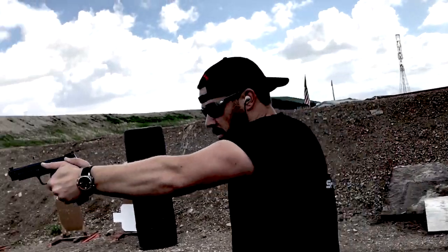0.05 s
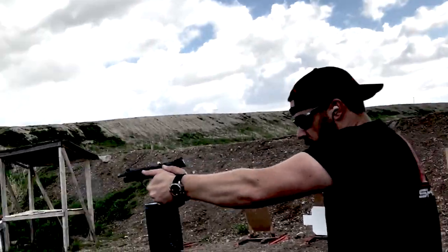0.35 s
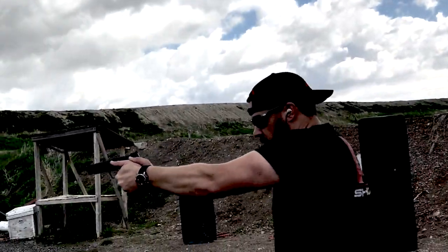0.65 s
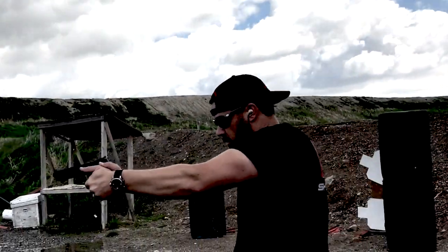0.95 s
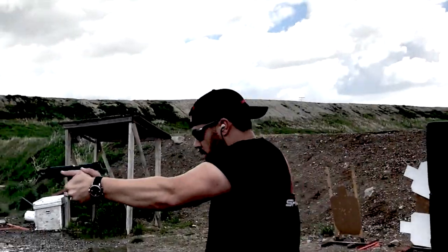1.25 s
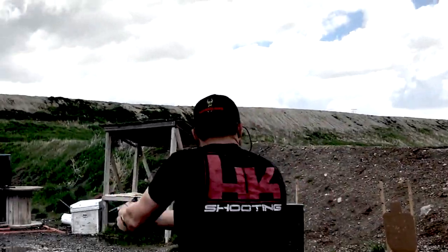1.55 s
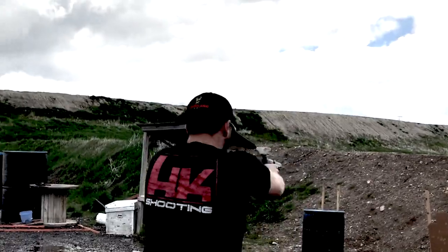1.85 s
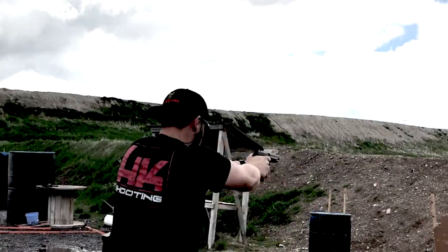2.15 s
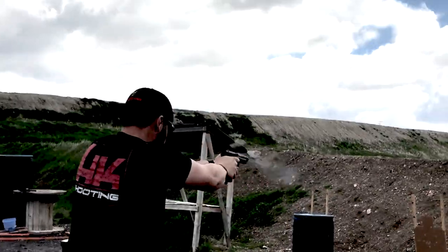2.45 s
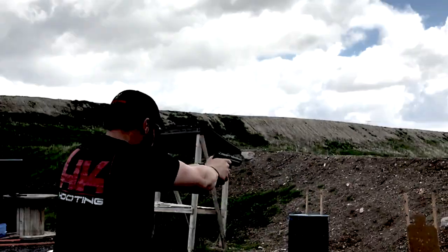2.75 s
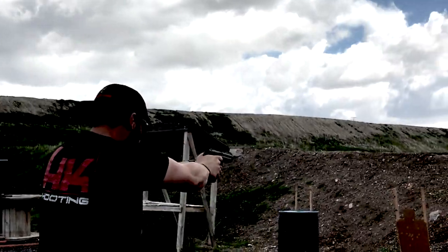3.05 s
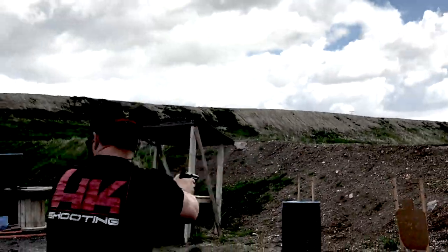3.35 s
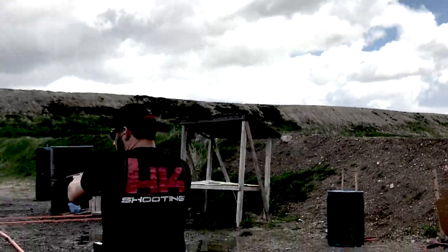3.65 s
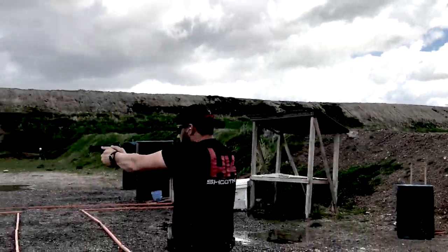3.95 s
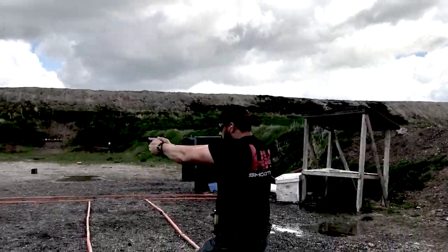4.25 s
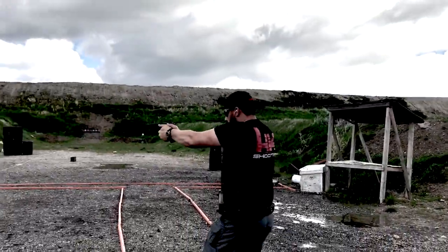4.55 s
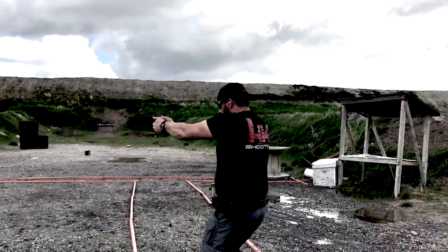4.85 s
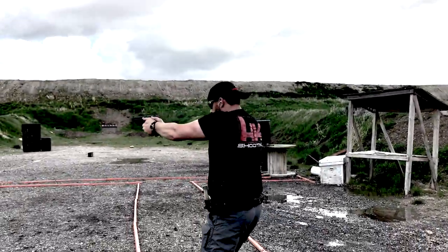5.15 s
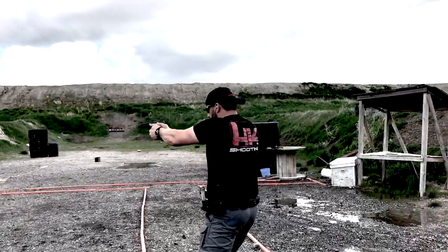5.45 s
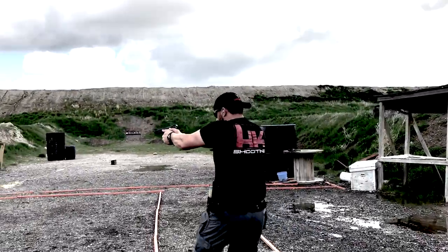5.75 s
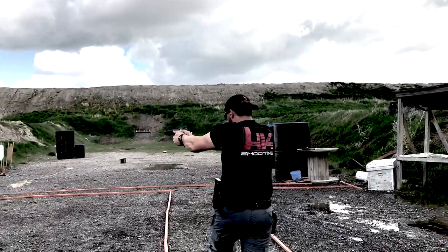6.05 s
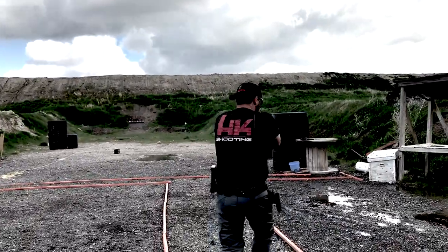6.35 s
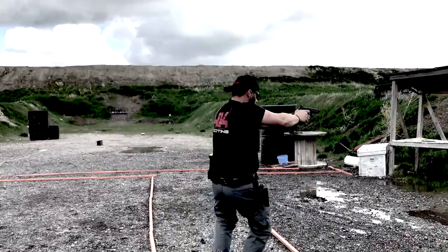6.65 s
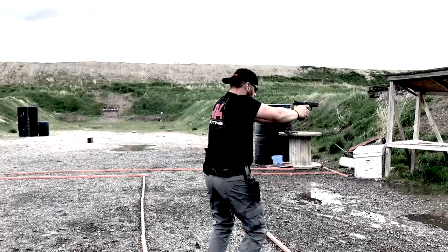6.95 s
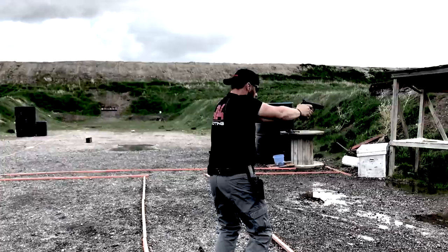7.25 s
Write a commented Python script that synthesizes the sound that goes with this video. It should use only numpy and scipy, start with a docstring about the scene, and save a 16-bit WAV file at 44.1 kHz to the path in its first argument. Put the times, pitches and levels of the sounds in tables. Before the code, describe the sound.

A pistol fires eleven sharp shots on an outdoor range, a few steps from the microphone. Four come in two quick pairs, then two spaced shots, a run of four and a final one. Each blast slightly overloads the microphone and slaps back from nearby objects and earth banks. In the pauses, boots crunch on gravel, spent brass cases tinkle faintly and light wind buffets the moving microphone.

```python
"""Pistol on a gravel range

Eleven shots outdoors, a few steps from a microphone that follows the shooter. Each blast overloads it,
scatters off the ground and slaps back from a shelter, barrels and earth banks, sooner as the shooter
advances; half a second later distant terrain answers with a faint falling sigh. Between the strings
boots crunch over gravel, spent brass cases tinkle and air buffets the moving microphone."""
import sys
import numpy as np
from scipy import signal
from scipy.fft import rfft, irfft
from scipy.io import wavfile

SR = 44100
rng = np.random.default_rng(int(sys.argv[2]) if len(sys.argv) > 2 else 0)


def to_wav(sig):
    """Store sig (one row per channel, or 1-D mono) as 16-bit WAV at the path in sys.argv[1].

    Samples outside -1..1 are clipped; the rate is SR.
    """
    pcm = np.clip(np.atleast_2d(sig), -1, 1) * 32767
    pcm = np.round(pcm).astype(np.int16)
    wavfile.write(sys.argv[1], SR, pcm.T)  # frames by channels


N = 330557

# shots: t/s, advance/m, crack/dB, roar/dB, roar hold/s, boom/dB, echoes/dB, rush/dB
SHOTS = [(.432, 0, -20, -15.5, 0.042, -33, 0.5, -16), (0.6895, 0.2, -16.5, -18, 0.025, -27, 0, -39),
         (1.0802, .89, -15.5, -18.5, 0.036, -25, -2, -34.5),
         (1.3438, 1.5, -13.5, -18.5, 0.035, -21.5, -0.5, -30.5),
         (2.5752, 3, -19.5, -17.5, 0.053, -16, -8.5, -19), (3.1975, 2.5, -14.5, -20, 0.037, -42, -5, -29.5),
         (4.7898, 5.5, -16.5, -21, .064, -21.5, -2.5, -19.5),
         (5.3014, 5, -16.5, -23, 0.037, -42, -1, -22.5), (5.7868, 5.5, -16.5, -21, 0.041, -36, 1, -38),
         (6.086, 5.5, -17, -20, 0.038, -34, 1.5, -36.5), (7.059, 7, -17, -18, 0.055, -21, -5.5, -18.5)]
# muzzle blast spectrum: f/Hz, level/dB
BLAST = [(18, -38.5), (30, -12.5), (945, 0), (1050, -1), (1260, -0.5), (1720, -6.5), (2550, -7), (4090, -9),
         (5040, -14), (6050, -12), (7260, -17.5), (8500, -15), (10500, -20.5), (11900, -16), (15500, -21)]


def amp(db):
    """Decibels to gain."""
    return 10 ** (np.asarray(db) / 20)


def unit(x):
    """Scale to unit rms."""
    return x / np.sqrt(np.mean(x ** 2) + 1e-20)


def read(points, hz):
    """Interpolate a table over log frequency."""
    f, value = np.transpose(points)
    return np.interp(np.log(hz + 1), np.log(f + 1), value)


def add(mix, s, sound):
    """Mix a sound in at time s."""
    part = mix[max(round(s * SR), 0):][:len(sound)]
    part += sound[:len(part)]


def colour(x, spectrum, tilt_db_oct=0):
    """Filter x by a tilted spectrum; unit rms."""
    hz = np.fft.rfftfreq(len(x), 1 / SR)
    gain = amp(read(spectrum, hz) + tilt_db_oct * np.log2(hz + 20))
    return unit(irfft(rfft(x) * gain, len(x)))


def noise(spectrum, size, tilt_db_oct=0):
    """Coloured noise, unit rms."""
    return colour(rng.standard_normal(size), spectrum, tilt_db_oct)


def wander(size, rate_hz):
    """Random line through Gaussian points, rate_hz of them a second."""
    return np.interp(np.arange(size) * rate_hz / SR, np.arange(size), rng.standard_normal(size))


def burst(spectrum, rise_s, decay_s):
    """Impulse smeared by a surface; unit peak."""
    t = np.arange(SR // 10) / SR
    x = noise(spectrum, len(t)) * (1 - np.exp(-t / rise_s)) * np.exp(-t / decay_s)
    return x / abs(x).max()


def round_trip_s(metres):
    """Echo delay at 343 m/s."""
    return 2 * metres / 343


def breeze(level_db=-60.5):
    """Soft air moving over the range."""
    air = [(30, -36), (100, -9.5), (220, -5.5), (450, -7), (900, -4), (1900, -3.5), (3200, -7), (5000, -13),
           (8000, -21), (15500, -26)]  # spectrum: f/Hz, level/dB
    return amp(level_db + 2 * wander(N, 6.2)) * noise(air, N)


def pebbles(per_s=200, level_db=-75):
    """Stray pebbles shift underfoot."""
    shifts = rng.exponential(1, N) * (rng.random(N) < per_s / SR)
    gain = amp(level_db + 3.2 * wander(N, 6.6))
    click = burst(BLAST, rise_s=0.00016, decay_s=0.00033)
    return gain * unit(signal.oaconvolve(shifts, click)[:N])


def mic_wind(calm_db=-66, drop_db_per_s=31):
    """Air buffets the microphone: builds and deepens on the move, drops at each stop."""
    buffet = [(20, -17), (50, -2.5), (100, -0.5), (180, 2), (280, -7.5), (700, -6.5), (1500, -21.5),
              (6000, -54), (16000, -85)]  # spectrum: f/Hz, level/dB
    walks = [(.42, -57.5, 19), (2.36, -42.5, 28), (4.6, -50.5, 15.5), (7.05, -49.5, 39.5)]  # wind peaks: t/s, level/dB, build-up/(dB/s)
    t = np.arange(N) / SR
    walking = sum(amp(db - np.maximum(build * (s - t), drop_db_per_s * (t - s)))
                  for s, db, build in walks)
    wind = amp(calm_db) * noise(buffet, N, tilt_db_oct=3) + walking * noise(buffet, N)
    return wind * amp(1.65 * wander(N, 27))


def boots(grains_per_s=1800, attack_s=0.025, sag_db_per_s=15, release_s=0.02, trim_db=-1):
    """Soles scuff the ground while pebbles click together in clumps."""
    steps = [(0.166, 0.35, -76, -49), (2.063, 0.05, -46.5, -53.5), (2.168, 0.089, -45, -44.5),
             (2.295, 0.27, -50, -47.5), (3.635, 0.086, -55.5, -53.5), (3.847, 0.2, -53.5, -55),
             (4.06, .12, -45, -46), (4.214, 0.19, -53.5, -45.5), (4.468, 0.13, -47, -50.5),
             (4.623, 0.058, -38, -57), (4.711, 0.084, -47.5, -55), (6.74, 0.18, -45.5, -47.5),
             (6.958, 0.049, -52.5, -54)]  # footfalls: t/s, length/s, scuff/dB, crunch/dB
    scuff_spectrum = [(150, -13), (250, -6), (555, -4), (983, 2.5), (2040, -2.5), (4030, -12), (4850, -17),
                      (6000, -18.5), (7800, -34), (13200, -120)]  # sole: f/Hz, level/dB
    crunch_spectrum = [(500, -2), (3000, -19), (6000, 1.5), (11000, 7), (15500, 9)]  # gravel: f/Hz, level/dB
    out, t = np.zeros(N), np.arange(N) / SR
    sizes = amp(7.5 * np.minimum(rng.exponential(1, N), 4.4)) * rng.choice([-1, 1], N)
    clicks = sizes * (rng.random(N) < grains_per_s / SR)
    crunch = colour(clicks, crunch_spectrum) + 1.06 * noise(crunch_spectrum, N)
    crunch = unit(crunch * amp(3.1 * wander(N, 120)))
    scuff = noise(scuff_spectrum, N) + 0.71 * colour(clicks, scuff_spectrum)
    scuff = unit(scuff * amp(2.64 * wander(N, 90)))
    for s, length_s, scuff_db, crunch_db in steps:
        press = np.clip(1 + (t - s) / attack_s, 0, 1) * amp(-sag_db_per_s * np.maximum(t - s, 0))
        lift = np.exp(-np.maximum(t - s - length_s, 0) / release_s)
        out += press * lift * (scuff * amp(scuff_db) + crunch * amp(crunch_db))
    return out * amp(trim_db + 2.5 * wander(N, 32))


def brass(flight_s=0.93, ring_t60_s=0.16, hop_s=0.046, rebound_db=-15, trim_db=-5):
    """Each case ticks on a stone, rings in two close modes as it tumbles and hops twice, ever softer."""
    landings = [(0.253, 9860, -44), (.391, 8260, -44), (.972, 10950, -46.5), (1.908, 11500, -47.5),
                (1.989, 9860, -45.5), (2.214, 11030, -40), (2.332, 11570, -40), (3.491, 11860, -49.5),
                (3.901, 10000, -39.5), (4.119, 15000, -34), (4.296, 11530, -36.5), (4.346, 10900, -37.5),
                (4.424, 10790, -32), (5.545, 10080, -60)]  # cases on stones: t/s, f/Hz, relative level/dB
    # one faint first touch per ejected case
    touches = [(s + rng.normal(flight_s, 0.12), rng.uniform(9600, 11730), -54) for s, *_ in SHOTS]
    out, t = np.zeros(N), np.arange(SR // 3) / SR
    for s, hz, db in landings + touches:
        split_hz = rng.uniform(8.4, 120)
        modes = np.sin(2 * np.pi * hz * t) + 0.5 * np.sin(2 * np.pi * (hz + split_hz) * t)
        for k in range(3):
            ring = modes * amp(1.9 * wander(len(t), 160) - 60 * t / ring_t60_s)
            tick = 0.96 * rng.standard_normal(len(t)) * np.exp(-t / 0.00062)
            add(out, s + hop_s * k ** 0.7, amp(db + trim_db + k * rebound_db) * (ring + tick))
    return out


def knocks():
    """Damped blows of gear and stones: a tone with grit spread around it."""
    blows = [(0.2535, -37.5, 6130, 0.0048, 0.66), (1.987, -33.5, 2640, 0.0035, 0.76),
             (3.901, -41, 5840, 0.0029, 0.9), (4.5163, -10.5, 735, 0.0015, 0.43),
             (4.521, -30, 100, 0.013, 0.08), (4.5577, -35, 5970, 0.00032, 0.94),
             (6.488, -25, 145, 0.0033, 0.22), (6.51, -41.5, 415, 0.028, 0.6)]  # t/s, level/dB, f/Hz, decay/s, grit share/0-1
    out, t = np.zeros(N), np.arange(SR // 8) / SR
    for s, db, hz, decay_s, share in blows:
        tone = np.sin(2 * np.pi * hz * t)
        grit = noise([(hz / 9, -26), (hz / 2, -6.5), (hz, 0), (hz * 4, -13), (hz * 20, -39)], len(t))
        add(out, s, amp(db) * np.exp(-t / decay_s) * ((1 - share) * tone + share * grit))
    return out


def rushes(rise_s=0.0076, thin_below_db=-34, lone_end_s=6.8, lone_db=-35):
    """A brief rush swells and stops short before each shot, and once alone; faint ones are thinner."""
    spectrum = [(60, -12), (400, -2), (600, 6), (800, -2.5), (1100, -3), (1500, -10.5), (2300, -14),
                (2650, -1), (3100, -.5), (3500, -20), (15000, -35)]  # f/Hz, level/dB
    out, t = np.zeros(N), np.arange(-1024, 0) / SR
    for end_s, *_, db in SHOTS + [(lone_end_s, lone_db)]:
        tilt_db_oct = 0.5 * max(thin_below_db - db, 0)
        swell = 0.099 + np.exp(t / rise_s)
        add(out, end_s + t[0], amp(db) * noise(spectrum, len(t), tilt_db_oct) * swell)
    return out


def crack(t):
    """Muzzle shock and near bounces, each a pressure jump then suction, with spatter off the gravel."""
    shocks = [(0, 0.00062, 5), (.0017, 0.00051, 6), (.0042, 0.0008, 12), (.0072, .001, -1),
              (0.0112, 0.00073, 10.5)]  # nominal delay/s, length/s, relative level/dB
    front = np.zeros(len(t))
    for delay_s, length_s, db in shocks:
        age_s = t - delay_s * rng.uniform(0.94, 1.3)
        u = np.maximum(age_s, 0) / length_s
        front += amp(db) * (age_s >= 0) * (1 - u) * np.exp(-u)
    snap = 1.73 * noise(BLAST, len(t), tilt_db_oct=0.5) * np.exp(-t / 0.0019)
    spatter = 0.72 * noise(BLAST, len(t), tilt_db_oct=1.5) * np.exp(-((t - 0.0115) / 0.0062) ** 2)
    return front + snap + spatter


def roar(t, hold_s, clump_db=3):
    """Rough ground scatters the blast in clumps; after the hold each band dies at its own rate."""
    decay = [(60, 0.067), (300, 0.36), (1000, 0.25), (3000, 0.26), (7000, 0.22), (15000, 0.18)]  # f/Hz, t60/s at speed 1
    speed = 0.057 / max(0.089 - hold_s, 0.01)  # longer hold, faster fade
    returns = noise(BLAST, len(t), tilt_db_oct=-0.56) * amp(clump_db * wander(len(t), 455))
    hz, frame_s, bands = signal.stft(unit(returns), SR, nperseg=256)
    fade = amp(-60 * speed * np.maximum(frame_s - hold_s, 0) / read(decay, hz)[:, None])
    return signal.istft(bands * fade, SR, nperseg=256)[1][:len(t)]


def boom(t, hz=64, peak_s=0.0099):
    """Low pressure swing of the blast."""
    swell = t / peak_s * np.exp(1 - t / peak_s)
    return swell ** 3 * np.sin(2 * np.pi * hz * t)


def roll(t, t60_s=0.88):
    """The blast rolls away over the banks."""
    spectrum = [(50, -27), (150, -6), (330, 13.5), (800, -2), (1500, -17), (3500, -6.5), (8000, -19),
                (15000, -39)]  # f/Hz, level/dB
    return amp(-60 * t / t60_s) * noise(spectrum, len(t))


def gunfire(roll_db=-43.5):
    """Each muzzle blast: crack, roar, boom and rolling tail."""
    out, t = np.zeros(N), np.arange(SR) / SR
    for s, _, crack_db, roar_db, hold_s, boom_db, echo_db, _ in SHOTS:
        blast = amp(crack_db) * crack(t) + amp(roar_db) * roar(t, hold_s) + amp(boom_db) * boom(t)
        add(out, s, blast + amp(roll_db + echo_db / 2) * roll(t))
    return out


def slapback(spread_db=0.5, bank_m=30.9, bank_db=-28.5, bank_db_per_m=0.23):
    """Near objects and the end bank reflect each shot, sooner (the bank louder) as the shooter nears."""
    # shelter, barrels, target stands, side bank: first distance/m, approach/(m/m), relative peak/dB
    reflectors = [(7.15, .42, -11), (10.75, 0.93, -13.5), (15.5, 1, -19), (21.4, 1, -26)]
    slap_spectrum = [(60, -15), (400, -9.5), (1200, 2), (2500, 7), (4000, -0.5), (7000, -7), (15000, -23)]  # near objects: f/Hz, level/dB
    bank_spectrum = [(60, -55), (300, 11), (900, 4.5), (1600, -3.5), (2500, -1.5), (5000, -11),
                     (15000, -42)]  # end bank: f/Hz, level/dB
    out = np.zeros(N)
    for s, advance_m, *_, echo_db, _ in SHOTS:
        for metres, approach, db in reflectors:
            gain = amp(db + echo_db + rng.normal(0, spread_db))  # varies as the muzzle turns
            slap = burst(slap_spectrum, rise_s=0.00015, decay_s=0.0013)
            add(out, s + round_trip_s(metres - approach * advance_m), gain * slap)
        smear = burst(bank_spectrum, rise_s=0.0047, decay_s=0.0026)
        edge = 0.86 * burst(BLAST, rise_s=0.000073, decay_s=0.00012)
        gain = amp(bank_db + echo_db + bank_db_per_m * advance_m)
        add(out, s + round_trip_s(bank_m - advance_m), gain * (smear + edge))
    return out


def grass_hiss(distance_m=50, level_db=-60, half_width_s=0.13):
    """Grassy slopes return each shot as a soft hiss."""
    spectrum = [(200, -23.5), (900, 16), (2000, 7.5), (3200, 8.5), (5000, -16), (8000, -51), (15000, -42)]  # f/Hz, level/dB
    out, t = np.zeros(N), np.arange(-SR // 5, SR // 5) / SR
    for s, advance_m, *_ in SHOTS:
        hiss = noise(spectrum, len(t)) * np.exp(-(t / half_width_s) ** 2)
        add(out, s + round_trip_s(distance_m - advance_m) + t[0], amp(level_db) * hiss)
    return out


def terrain_sigh(distance_m=83, level_db=-50.5, half_width_s=0.04, pair_s=0.35,
                 centre_hz=1066, width_hz=560, glide_oct_per_s=-4, overtone_db=-5.5):
    """Distant ground returns a falling band of noise; of a close pair only the second shot sighs."""
    out, t = np.zeros(N), np.arange(-SR // 5, SR // 5) / SR
    phase = 2 * np.pi * np.cumsum(centre_hz * 2 ** (glide_oct_per_s * t)) / SR
    pauses_s = np.diff([s for s, *_ in SHOTS], append=np.inf)
    for (s, advance_m, *_), pause_s in zip(SHOTS, pauses_s):
        if pause_s > pair_s:
            low, high = [wander(len(t), width_hz * k) * np.cos(k * phase)
                         + wander(len(t), width_hz * k) * np.sin(k * phase) for k in (1, 2)]
            sigh = unit(low + amp(overtone_db) * high) * np.exp(-(t / half_width_s) ** 2)
            add(out, s + round_trip_s(distance_m - advance_m) + t[0], amp(level_db) * sigh)
    return out


def scene():
    """Mono sum at the microphone."""
    shooting = rushes() + gunfire() + slapback() + grass_hiss() + terrain_sigh()
    ground = pebbles() + boots() + brass() + knocks()
    return (shooting + ground + breeze() + mic_wind())[None]


def record(dry, ceiling=0.49, low_cut_hz=28, band_limit_hz=15900):
    """Microphone: soft overload, bass cut, band limit."""
    driven = ceiling * np.tanh(dry / ceiling)
    highpass = signal.butter(2, low_cut_hz, "highpass", fs=SR, output="sos")
    lowpass = signal.firwin(511, band_limit_hz, window=("kaiser", 9), fs=SR)
    return signal.oaconvolve(signal.sosfilt(highpass, driven), lowpass[None], "same")


dry = scene()
out = record(dry)
to_wav(out)
```